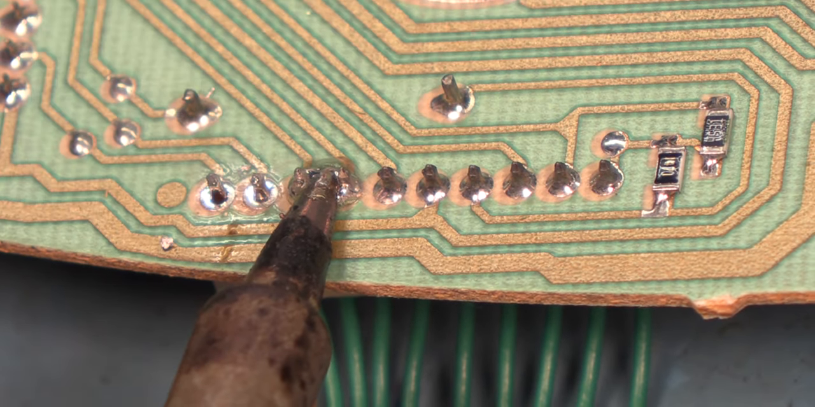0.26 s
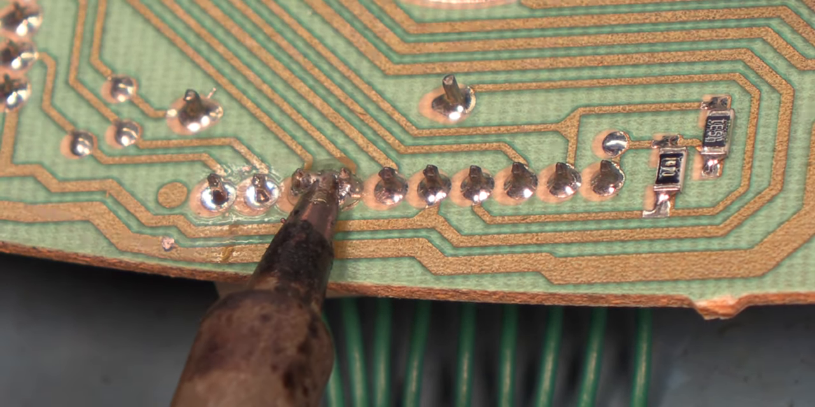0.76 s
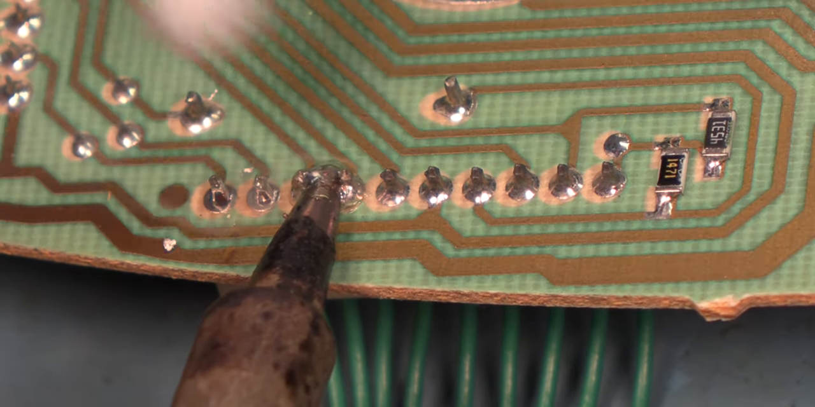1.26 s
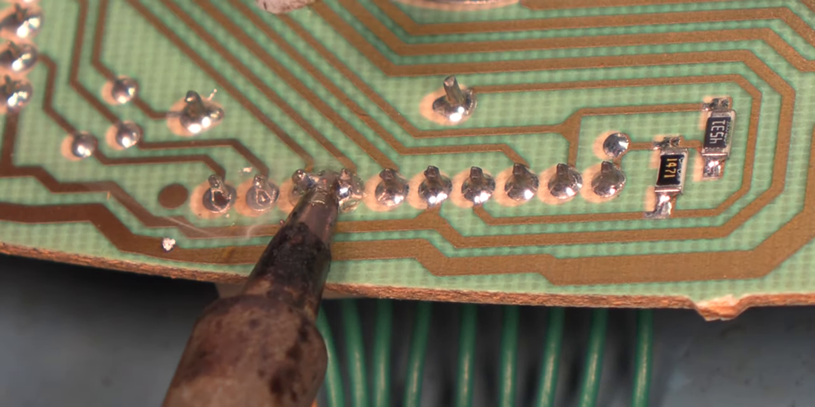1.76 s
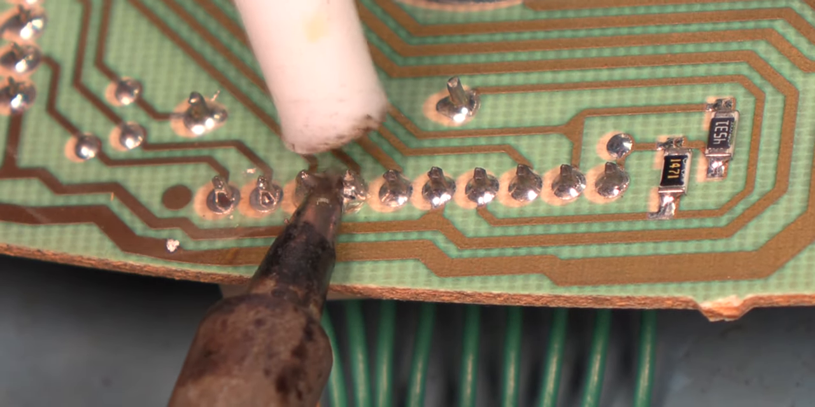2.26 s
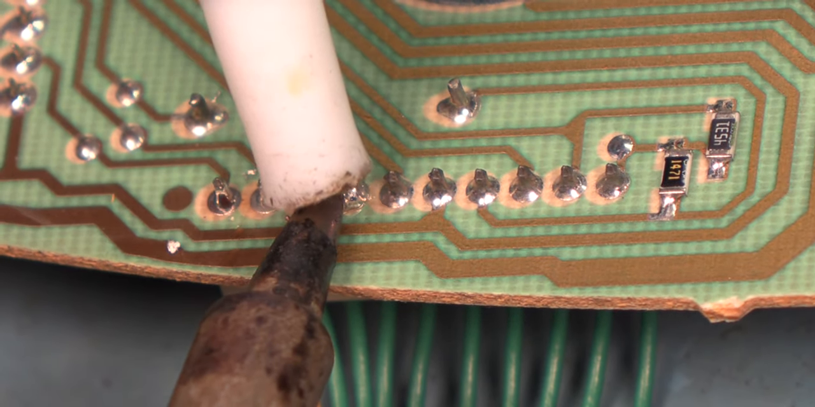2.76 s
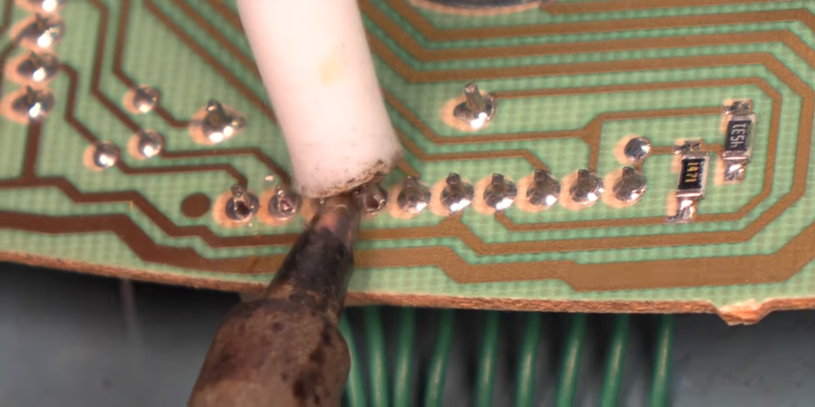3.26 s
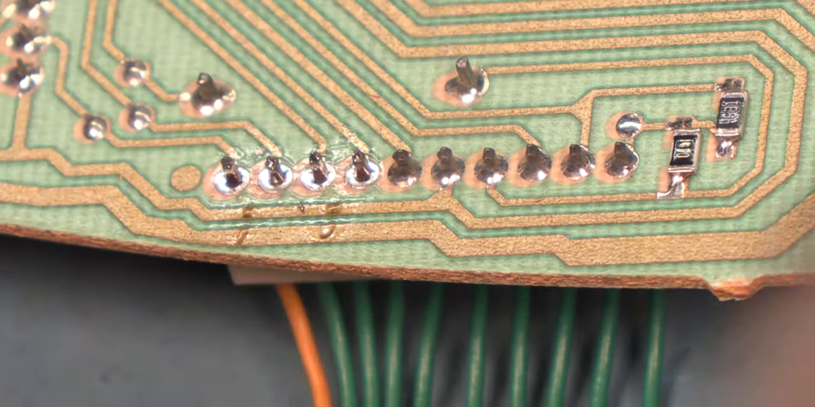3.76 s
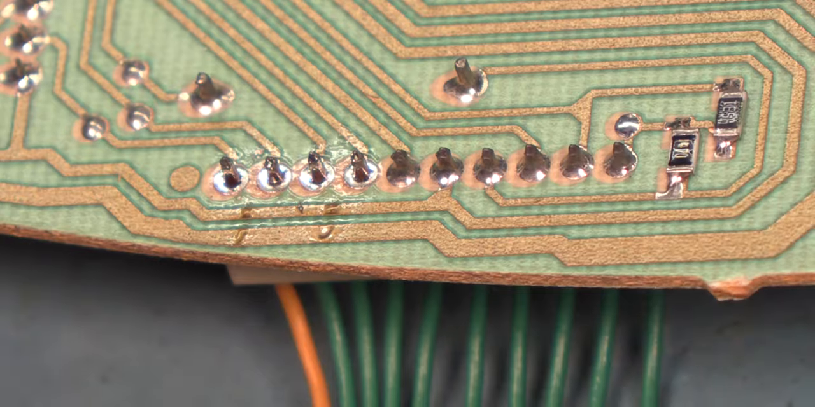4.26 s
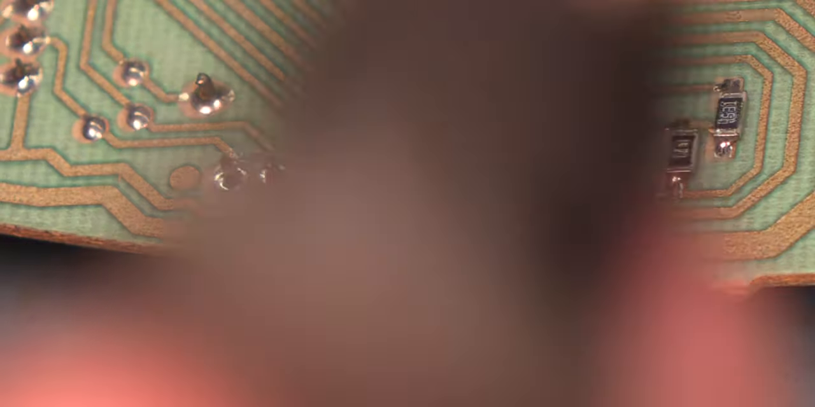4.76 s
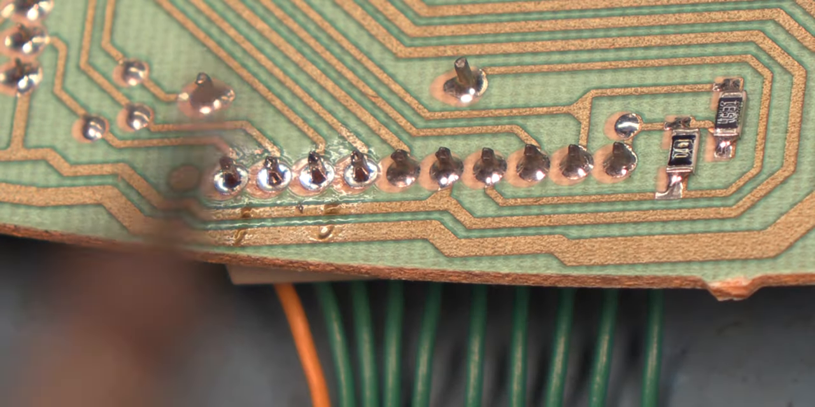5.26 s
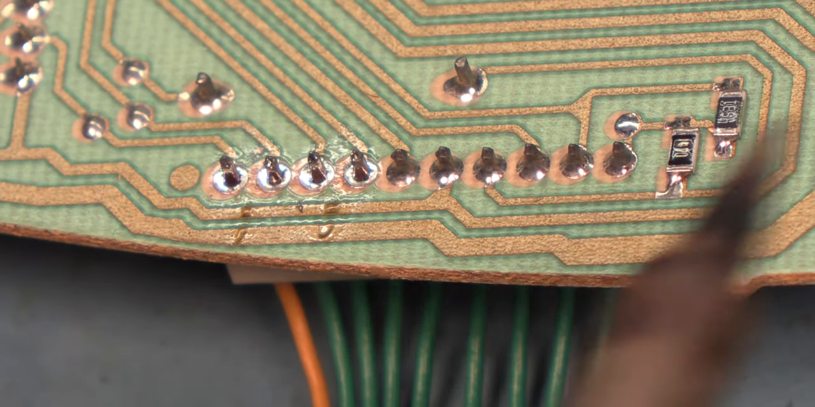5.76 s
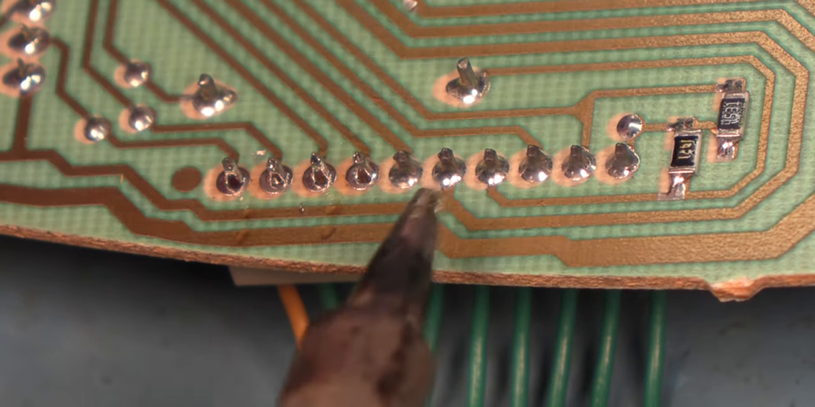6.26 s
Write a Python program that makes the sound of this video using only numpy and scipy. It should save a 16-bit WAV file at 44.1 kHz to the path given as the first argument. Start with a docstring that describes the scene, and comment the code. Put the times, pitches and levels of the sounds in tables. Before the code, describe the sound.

A solder pump snaps sharply near the microphone, is rasped back between hard clicks until its spring rings, then heavy knocks and soft fumbling follow.

```python
"""Spring-loaded solder pump over a circuit board on a wooden bench in a small quiet room.
Plunger released with a double snap, pushed back with a hissing rasp between clacks until it latches and its
spring rings: noise bursts, rubbed noise through barrel resonances, jolted coil modes, gliding noise bands.
Tools thud on the bench top (damped modes); fingers and sleeves rustle (shaped noise); the room hums faintly."""
import sys
import numpy as np
from scipy import signal
from scipy.fft import rfft, irfft
from scipy.io import wavfile

SR = 44100
rng = np.random.default_rng(int(sys.argv[2]) if len(sys.argv) > 2 else 0)


def transcribe(signal):
    """Save signal, clipped to [-1, 1], as a 16-bit WAV file at the path in sys.argv[1]."""
    frames = np.atleast_2d(signal).T
    limited = np.clip(frames, -1, 1)
    pcm = np.round(limited * 32767).astype(np.int16)
    wavfile.write(sys.argv[1], SR, pcm)


def invert_db(x):
    """Field ratio 10**(x/20) for x, a level in decibels (scalar or array-like)."""
    u = np.asarray(x, float) / 20
    return 10 ** u


N = 287311

# steady room air: f/Hz, relative density/dB per Hz
AIR_SPECTRUM = [(15, -40.5), (25, -3.5), (66, -1.5), (93, -9.5), (125, -4), (150, -23), (176, -6.5),
                (207, -30.5), (515, -36.5), (927, -23.5), (1210, -33), (10600, -39), (15000, -50.5)]
AIR_RMS_DB = -69
# hum lines: f/Hz, mean peak level/dB
HUM_LINES = [(119, -84), (176.5, -84), (910, -97)]

# fingers and sleeves: t/s, dull rub level/dB, bright rustle level/dB
RUSTLE_LEVELS = [(0.0, -73, -76), (.07, -69, -68), (.26, -64, -68.5), (.374, -58.5, -67.5), (.5, -62, -70),
                 (.65, -74, -79), (.75, -74.5, -74.5), (1.2, -76, -76.5), (1.44, -71, -75),
                 (1.52, -78, -83.5), (2.9, -80.5, -89.5), (3.4, -71.5, -85.5), (3.7, -72.5, -81.5),
                 (3.96, -62, -69), (4.38, -65, -75.5), (5.05, -78.5, -77.5), (5.52, -85, -77),
                 (5.79, -66, -72), (6.51, -68.5, -74.5)]
# dull rub: f/Hz, relative density/dB per Hz
RUB_SPECTRUM = [(35, -37.5), (60, -8), (341, 2), (375, 1.5), (745, -9), (1500, -15), (1950, -53),
                (3300, -120)]
# bright rustle: f/Hz, relative density/dB per Hz
CLOTH_SPECTRUM = [(470, -31.5), (800, -2.5), (1170, -13), (1710, -1.5), (2940, -4), (4790, -7.5),
                  (11200, -19), (15000, -28)]
# bright rustling bursts, mostly dying away after a clack: t/s, level/dB
RUSTLE_BURSTS = [(1.185, -62.5), (4.12, -59.5), (4.9, -43)]
BURST_FALL_DB_PER_S = 110.0
# loose things jiggled by a thud, relative to its peak
JIGGLE_BRIGHT_DB, JIGGLE_DULL_DB, JIGGLE_FALL_DB_PER_S = -40.5, -39, 250.5

# bench top trembling under resting arms: t/s, level/dB
TREMBLE_LEVELS = [(0.0, -68), (.98, -71), (1.25, -78), (1.68, -73), (2.14, -78), (2.7, -71.5),
                  (3.92, -68.5), (4.3, -74.5), (4.65, -60), (5.15, -84), (5.6, -59), (6.51, -64.5)]
SHIVER_DB, SHIVER_FALL_DB_PER_S = -39.5, 74  # left by a thud, relative to its peak

# faint squeaks and spring whistles, some narrow, some a broad spring wash:
# t/s, length/s, first f/Hz, width/Hz, level/dB
SQUEAK_EVENTS = [(.005, 0.035, 1720, 162, -70), (.107, 0.055, 1650, 131, -58.5),
                 (.059, 0.11, 2900, 160, -71), (.164, 0.12, 1730, 80, -75), (3.913, 0.12, 1724, 201, -73.5),
                 (4.027, 0.034, 890, 120, -60.5), (4.153, 0.85, 680, 89, -58),
                 (4.196, .14, 1070, 99, -71.5), (4.462, 0.081, 2050, 110, -53),
                 (4.899, 0.64, 1167, 500, -61.5), (5.502, 0.79, 1300, 348.6, -68.5)]
SQUEAK_RISE_OCTAVES_PER_S = 0.19

# thuds through the bench top: t/s, peak/dB, most excited f/Hz, spread/octaves,
# ring time of this thud re the mode's usual t60/1 (used within 0.1..2)
THUD_EVENTS = [(.03, -51, 278, .6, 0.79), (.37, -43.5, 405, 0.73, 0.5), (.456, -42.5, 378, 0.37, .3),
               (.678, -41.5, 90, 0.77, 0.35), (.694, -26, 115, .15, 0.99), (0.721, -27.5, 119, .4, 0.8),
               (.745, -39, 184, 0.28, 1), (1.68, -54.5, 300, 0.83, 0.9), (1.756, -56, 275, 0.3, 0.93),
               (2.596, -54.5, 95, 1.2, 0.6), (2.72, -55.5, 113, 1.05, 0.44), (2.918, -53, 151, .8, 0.36),
               (2.96, -50.5, 110, 0.46, 0.23), (3.077, -46, 300, 0.89, 0.94), (3.103, -47, 99, 0.99, 0.24),
               (3.183, -43, 255, 1.05, 1.5), (3.208, -43, 187, 0.47, 0.94), (3.237, -48.5, 221, 0.41, 0.78),
               (3.422, -12.5, 100, 1.9, 0.92), (3.424, -19.5, 416, .3, 0.36), (3.434, -14.5, 90, 1.1, 1.27),
               (3.441, -16.5, 381, 0.83, .64), (3.601, -40, 189, 0.56, 0.7), (3.996, -47, 248, 1.28, 0.32),
               (4.127, -45, 205, 0.62, 0.55), (4.188, -51, 204, 0.86, .43), (4.427, -22, 400, 1.2, 0.37),
               (4.603, -40, 115, 0.88, 0.8), (4.632, -27, 495, 0.9, 0.2), (4.66, -31, 358, 0.33, 0.39),
               (4.755, -27, 300, 1.46, 0.23), (4.892, -31.5, 355, .27, 0.24),
               (5.271, -15.5, 180.6, 1.3, 0.95), (5.277, -27.5, 347, 0.57, 0.58),
               (5.299, -25.5, 150, 1.33, 1.03), (5.315, -28.5, 273, .47, 0.93),
               (5.361, -16.5, 187, 0.93, 1.55), (5.375, -25.5, 330, 0.57, 0.74),
               (5.398, -18, 144.1, 1.07, 0.86), (5.428, -24, 183, 1.12, 0.77),
               (5.621, -42.5, 179.6, 0.39, 2.24), (5.703, -51.5, 422, 0.92, 0.28),
               (5.817, -38, 170, 0.46, .77), (5.861, -30, 183.8, 0.77, 1.72),
               (5.885, -43, 278.4, 0.38, .95), (5.971, -41.5, 175, 0.44, .9), (6.073, -42, 158, 0.45, 1.9),
               (6.214, -40.5, 177, 0.56, 1.2), (6.318, -44, 110, .95, .8), (6.428, -44, 172, 0.71, .96)]
# bench-top modes: f/Hz, relative level/dB, usual t60/s
BENCH_MODES = [(59.5, -5.5, 0.29), (85.3, 2, 0.076), (116.45, -1, .25), (147, -6.5, 0.17), (178, -2.5, .33),
               (209, -5.5, 0.13), (271.5, -1, 0.12), (362.3, -2, 0.13), (460, -9.5, 0.045),
               (512, -4.5, 0.099), (598, -3, .12), (684, -10.5, 0.34), (850, -15.5, 0.092)]

# room echoes by band: f/Hz, level/dB, t60/s
ROOM_BANDS = [(300, -12, 0.32), (860, -7.5, 0.22), (2170, -11, 0.22), (4770, -13.5, 0.29),
              (8900, -17.5, .23), (13000, -16.5, 0.22)]

# clacks and ticks of pump and tools: t/s, level/dB, body re level/dB, bright edge re level/dB, ring f/Hz
CLACK_EVENTS = [(0.361, -46, -23, -15, 2040), (0.395, -39, -19, -11, 1820), (0.455, -38, -30, -9.5, 5260),
                (0.4974, -49, -28, -16, 1800), (.5664, -55, -24, -11, 4230), (.679, -57, -12, -30, 3200),
                (0.736, -54, -15, -10.5, 4500), (0.7531, -47.5, -20, -7, 2820),
                (1.1772, -37.5, -10, -42, 1936), (1.2585, -51, -16, -20, 2900), (1.429, -55, -3, -30, 1810),
                (2.9139, -48.5, -25, -34, 1730), (2.9521, -52.5, -19, -15, 3600),
                (3.3657, -48.5, -16, -13.5, 4244), (3.4183, -12, -6, -12, 9500),
                (3.4229, -13, -10, -3, 3800), (3.435, -6, -18, -8, 7100), (3.9258, -53, -19, -20.5, 1740),
                (4.007, -43.5, -16, -38, 3230), (4.035, -44, -8.5, -27, 3060),
                (4.136, -37.5, -10, -10, 2236), (4.3263, -52, -13.5, -7.5, 4530),
                (4.4, -33.5, -4, -3, 1910), (4.428, -18, -18, -6.5, 3270), (4.6302, -3.5, -18, -4, 6500),
                (4.7561, -9, -20.5, -7, 4800), (4.8927, -2.5, -23.5, -11.5, 2500),
                (5.2724, -43, 1, -30, 1510), (5.2993, -38, -8, -37, 2330), (5.3623, -41, -13, -5, 4000),
                (5.565, -60, -25, 3.5, 7000), (5.7027, -44.5, -3, -33, 3750), (5.8593, -55, 1.5, -18, 2310)]
TOUCH_MS, TOUCH_MS_PER_BODY_DB = 4.84, 0.11  # contacts that reach the hollow body last longer
# ring of a 0 dB clack at 2400 Hz; hard clacks have slightly more ring, high rings less
RING_DB, RING_DB_PER_CLACK_DB, RING_DB_PER_OCTAVE = -7.0, 0.04, -3

# plunger seal in the barrel, one table a stroke: t/s, level/dB
SLIDE_STROKES = [
    [(3.4155, -55.5), (3.419, -24.5), (3.452, -27.5), (3.47, -45)],
    [(4.389, -62), (4.42, -38.5), (4.465, -42.5), (4.5, -46), (4.53, -35.5), (4.61, -25.5), (4.63, -33)],
    [(4.725, -55.5), (4.748, -34), (4.77, -40), (4.81, -30), (4.865, -29), (4.892, -36.5)],
]
# seal rub: f/Hz, relative density/dB per Hz
RASP_SPECTRUM = [(180, -53), (300, -33.5), (1010, -22), (1210, -10), (3080, -7), (4300, -3.5), (4590, -5.5),
                 (6520, 2), (7320, -2.5), (12900, -7.5), (16000, -14)]
# barrel resonances: f/Hz, width/Hz, mean gain/dB
BARREL_RESONANCES = [(2500, 170, 2), (3400, 200, 0.5), (4860, 300, 2.5), (7000, 90, 2.5), (7630, 90, 1),
                     (8570, 950, 1.5), (9500, 350, -2), (12500, 190, -1)]
BRIGHT_DB, BRIGHT_DB_PER_LEVEL_DB = 3, 0.1  # treble gain at level 0 dB, and its slope

# jolts to the spring: t/s, level/dB
SPRING_JOLTS = [(4.429, -59), (4.758, -55), (4.893, -48), (5.035, -56.5), (5.272, -53), (5.364, -73)]
# coil spring modes: f/Hz, mean gain/dB, t60/s
SPRING_MODES = [(298, -16, 1.8), (448, -10, 0.59), (572, -8.5, 0.69), (714, -15.5, 0.54),
                (840, -14.5, 0.57), (919.6, -11, .8), (985, -4.5, 1), (1082, -9, 0.79), (1109, -5, .3),
                (1144, -9.5, 0.45), (1318.5, -0.5, 0.44), (1367, -9, 0.67), (1440, -7.5, .4),
                (1550, -12, .5), (1620, -8, 0.47), (1986, -13, 0.56), (2200, -3.5, 0.4), (2288, -10.5, .45),
                (2490, -5, .25), (2713, -7, .3), (2860, -9.5, .35), (3015, -9.5, 0.81), (3360, -11.5, 0.28),
                (3730, -11, 0.5), (4000, -12, 0.33)]


def rms_one(x):
    """Scale to unit power."""
    return x / np.sqrt(np.mean(x ** 2) + 1e-20)


def in_time(rows, outside=None):
    """Interpolate the columns of a curve to one value per sample."""
    s, *columns = np.transpose(rows)
    t = np.arange(N) / SR
    return [np.interp(t, s, column, outside, outside) for column in columns]


def coloured(x, spectrum):
    """Filter noise to a spectrum; rms 1."""
    hz, db = np.transpose(spectrum)
    grid_hz = np.fft.rfftfreq(len(x), 1 / SR) + 1
    gain = invert_db(np.interp(np.log(grid_hz), np.log(hz), db))
    return rms_one(irfft(rfft(x) * gain, len(x)))


def drift(rate_hz):
    """Random curve through rate_hz knots a second; rms 1."""
    knots = rng.standard_normal(int(N / SR * 400))
    return rms_one(np.interp(np.arange(N) / SR * rate_hz, np.arange(len(knots)), knots))


def cut(x, hz, kind, order=2):
    """Butterworth filter."""
    sos = signal.butter(order, np.clip(hz, 20, SR / 2.2), kind, fs=SR, output="sos")
    return signal.sosfilt(sos, x)


def resonance(x, hz, width_hz):
    """Two-pole resonance, peak gain 1."""
    r = np.exp(-np.pi * width_hz / SR)
    poles = [1, -2 * r * np.cos(2 * np.pi * hz / SR), r * r]
    return signal.lfilter([(1 - r * r) / 2, 0, (r * r - 1) / 2], poles, x)


def add(out, s, sound):
    """Mix a sound in at time s."""
    i = round(s * SR)
    out[i:i + len(sound)] += sound[:len(out) - i]


def grains(depth_db, rate_hz):
    """Noise whose strength jumps about, as many small contacts do."""
    return rng.standard_normal(N) * invert_db(depth_db * drift(rate_hz))


def after(events, db, fall_db_per_s):
    """Gain that jumps at each event, db re its level, and dies away; events add in power."""
    kicks = np.full(N, 1e-18)
    for s, event_db, *_ in events:
        kicks[round(s * SR)] += invert_db(2 * (event_db + db))
    power = signal.lfilter([1], [1, -invert_db(-2 * fall_db_per_s / SR)], kicks)
    return np.sqrt(power)


def quiet_room():
    """Steady air noise plus hum lines wavering in level and phase."""
    t = np.arange(N) / SR
    hum = np.zeros(N)
    for hz, db in HUM_LINES:
        level = invert_db(db + 1.5 * drift(5.0))
        hum += level * np.sin(2 * np.pi * hz * t + 0.95 * drift(9.9))
    return invert_db(AIR_RMS_DB) * coloured(rng.standard_normal(N), AIR_SPECTRUM) + hum


def rustle():
    """Skin and cloth on the bench: dull rub and patchy bright rustle, stirred up by every thud."""
    rub_db, cloth_db = in_time(RUSTLE_LEVELS)
    dull = invert_db(rub_db) + after(THUD_EVENTS, JIGGLE_DULL_DB, JIGGLE_FALL_DB_PER_S)
    bright = invert_db(cloth_db) + after(THUD_EVENTS, JIGGLE_BRIGHT_DB, JIGGLE_FALL_DB_PER_S)
    bright += after(RUSTLE_BURSTS, 0, BURST_FALL_DB_PER_S)
    rub = dull * invert_db(2.0 * drift(42.0)) * coloured(grains(1.5, rate_hz=20.0), RUB_SPECTRUM)
    cloth = bright * invert_db(2.0 * drift(37.0)) * coloured(grains(0.81, rate_hz=69.0), CLOTH_SPECTRUM)
    return rub + cloth


def tremble():
    """Weak unsteady pushes keep the six lowest bench modes murmuring; thuds leave them shivering."""
    pushes = grains(2.7, rate_hz=26.0)
    modes = sum(invert_db(db) * resonance(pushes, hz, 0.64 / t60) for hz, db, t60 in BENCH_MODES[:6])
    arms_db, = in_time(TREMBLE_LEVELS)
    shiver = after(THUD_EVENTS, SHIVER_DB, SHIVER_FALL_DB_PER_S)
    return (invert_db(arms_db) + shiver) * rms_one(modes)


def squeaks():
    """Faint squeaks and spring whistles, some narrow, some a broad wash: noise bands gliding slowly up."""
    out = np.zeros(N)
    for s, length_s, first_hz, width_hz, db in SQUEAK_EVENTS:
        last_hz = first_hz * 2 ** (SQUEAK_RISE_OCTAVES_PER_S * length_s)
        n = int(length_s * SR)
        phase = 2 * np.pi * np.cumsum(np.linspace(first_hz, last_hz, n)) / SR
        # two slow noises on quadrature carriers; filter onset dropped
        wobble = cut(rng.standard_normal((2, n + 4000)), width_hz / 2, "low")[:, 4000:]
        tone = rms_one(wobble[0]) * np.cos(phase) + rms_one(wobble[1]) * np.sin(phase)
        add(out, s, invert_db(db) * rms_one(tone) * np.sqrt(np.hanning(n)))
    return out


def bench():
    """Where a blow lands decides which modes it reaches; contact lasts about a quarter of their cycle."""
    out, t = np.zeros(N), np.arange(SR // 2) / SR
    hz, mode_db, t60 = np.transpose(BENCH_MODES)[:, :, None]
    # bending waves spread out on their way: modes do not start in step
    lag_rad = -1.3 * np.arange(len(BENCH_MODES))[:, None]
    for s, db, centre_hz, spread_octaves, ring_ratio in THUD_EVENTS:
        uneven_db = rng.normal(0, 3, hz.shape)
        octaves = np.log2(hz / centre_hz)
        reach_db = -9.0 * (octaves / np.clip(spread_octaves, .15, 3)) ** 2 + uneven_db
        decay_db = -60 * t / (t60 * np.clip(ring_ratio, .1, 2))
        modes = invert_db(mode_db + reach_db + decay_db) * np.sin(2 * np.pi * hz * t + lag_rad)
        contact = np.hanning(int(.25 * SR / centre_hz))
        thud = signal.fftconvolve(modes.sum(axis=0), contact)
        onset = 1 - np.exp(-np.arange(len(thud)) / SR / 0.00043)
        thud = cut(thud * onset, centre_hz / 6.7, "high")
        add(out, s, invert_db(db) * thud / np.abs(thud).max())
    return out


def walls(x):
    """Dense echoes: noise dying away in each band, building up over the first reflections."""
    t = np.arange(SR // 2) / SR
    tail = np.zeros(len(t))
    for hz, db, t60 in ROOM_BANDS:
        noise = cut(rng.standard_normal(len(t)), [hz / 1.55, hz * 1.55], "band")
        band = noise * invert_db(-60 * t / t60) * (1 - np.exp(-t / 0.0039))
        tail += invert_db(db) * band * np.sqrt(2 * hz / SR / np.sum(band ** 2))
    return signal.fftconvolve(x, tail)[:N]


def clacks():
    """A few ms of chattering contact, then loose parts rattle out: crack, short ring, hollow body, edge."""
    out, t = np.zeros(N), np.arange(SR // 8) / SR
    rattle = invert_db(-17.5) * (1 - np.exp(-t / 0.0014)) * np.exp(-t / .018)
    for s, db, body_db, edge_db, ring_hz in CLACK_EVENTS:
        touch_ms = np.clip(TOUCH_MS + TOUCH_MS_PER_BODY_DB * body_db, .3, 30)
        ring_db = RING_DB + RING_DB_PER_CLACK_DB * db
        ring_db += RING_DB_PER_OCTAVE * np.log2(ring_hz / 2400)
        touch = (1 - np.exp(-t / 0.00022)) * np.exp(-(1000 * t / touch_ms) ** 0.97)
        contact = rng.standard_normal((3, len(t))) * (touch + rattle)
        crack = cut(contact[0], [1700, 6200], "band", order=3)
        edge = cut(contact[1], [6000, 14500], "band")
        body = cut(contact[2], [650, 1500], "band")
        ring = touch * np.sin(2 * np.pi * ring_hz * t)
        layers = [(-3, crack), (ring_db, ring), (edge_db, edge), (body_db, body)]
        clack = sum(invert_db(layer_db) * layer / np.abs(layer).max() for layer_db, layer in layers)
        add(out, s, invert_db(db) * clack)
    return out


def slide():
    """Seal rubs the barrel wall: dense grains, coloured by barrel resonances that come and go."""
    rub = coloured(grains(1.3, rate_hz=400.0), RASP_SPECTRUM)
    rings = np.zeros(N)
    for hz, width_hz, db in BARREL_RESONANCES:
        rings += invert_db(db + 3.8 * drift(66.0)) * resonance(rub, hz, width_hz)
    rasp = rms_one(rub + rings)
    treble, out = cut(rasp, 4700, "high"), np.zeros(N)
    for stroke in SLIDE_STROKES:
        level_db, = in_time(stroke, outside=-150)
        # a faster, louder seal sounds brighter
        bright_db = BRIGHT_DB + BRIGHT_DB_PER_LEVEL_DB * level_db
        out += invert_db(level_db) * (rasp + (invert_db(bright_db) - 1) * treble)
    return out


def spring():
    """Each jolt makes the coils chatter for a moment; every mode rings on, beating unevenly."""
    chatter, t = np.full(N, 1e-18), np.arange(SR // 4) / SR
    for s, db in SPRING_JOLTS:
        burst = rng.standard_normal(len(t)) * np.exp(-t / 0.043)
        add(chatter, s, invert_db(db) * burst / np.sqrt(np.sum(burst ** 2)))
    out = np.zeros(N)
    for hz, db, t60 in SPRING_MODES:
        r, w = invert_db(-60 / (t60 * SR)), 2 * np.pi * hz / SR
        beating_db = 3.2 * drift(70.0)
        ringing = signal.lfilter([0, np.sin(w)], [1, -2 * r * np.cos(w), r * r], chatter)
        out += invert_db(db + beating_db) * ringing
    return out


def scene():
    """Pump near the microphone, bench under it, room around; one channel."""
    near = clacks() + slide() + bench()
    mix = near + walls(near) + spring() + squeaks() + rustle() + tremble() + quiet_room()
    return mix[None, :]


def band_limit(x):
    """A steep low-pass at the top of the band."""
    return signal.sosfilt(signal.butter(12, 16990, fs=SR, output="sos"), x)


def record(dry):
    """Deep bass and the very top are missing."""
    no_bass = cut(dry, 45, "high", order=4)
    mix = cut(no_bass, 16050, "low", order=10)
    return band_limit(mix)


dry = scene()
out = record(dry)
transcribe(out)
```